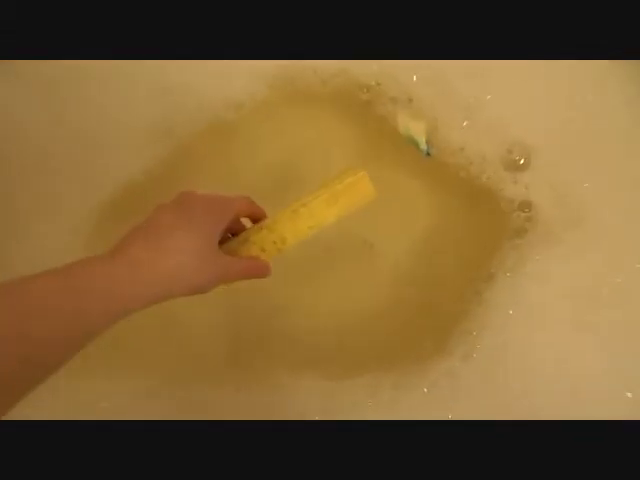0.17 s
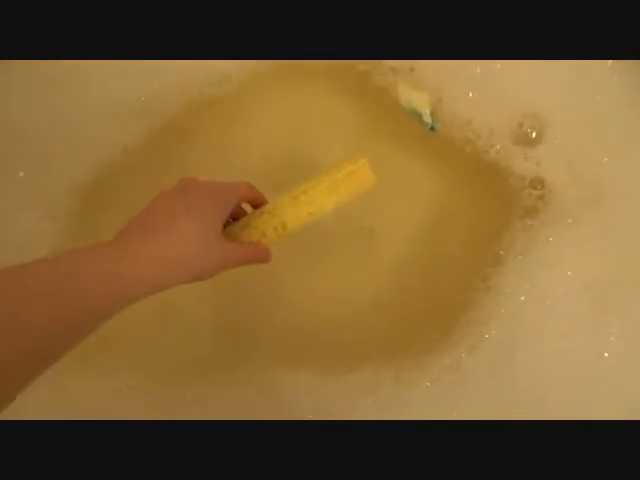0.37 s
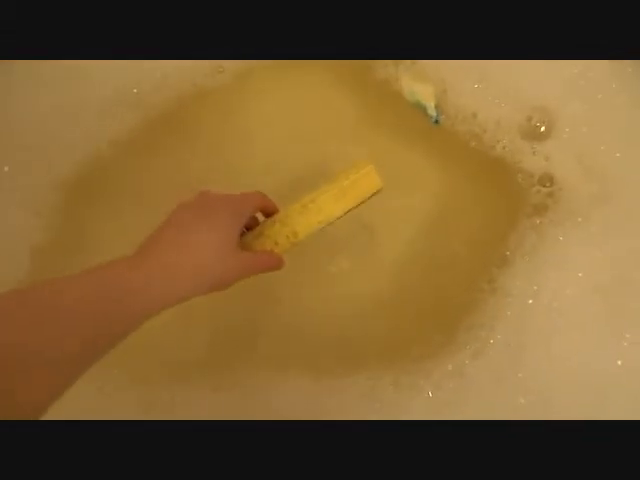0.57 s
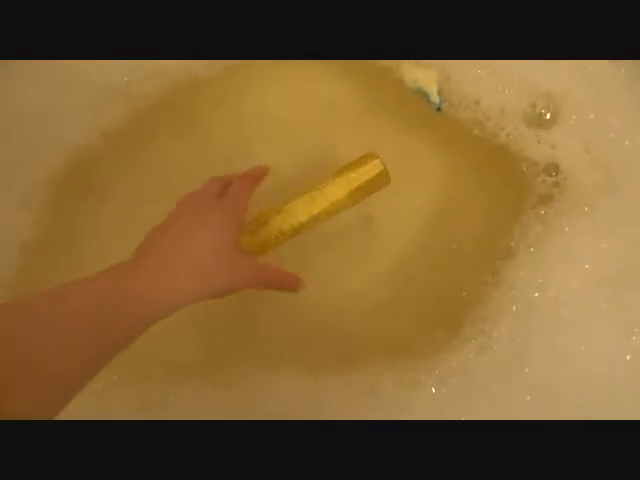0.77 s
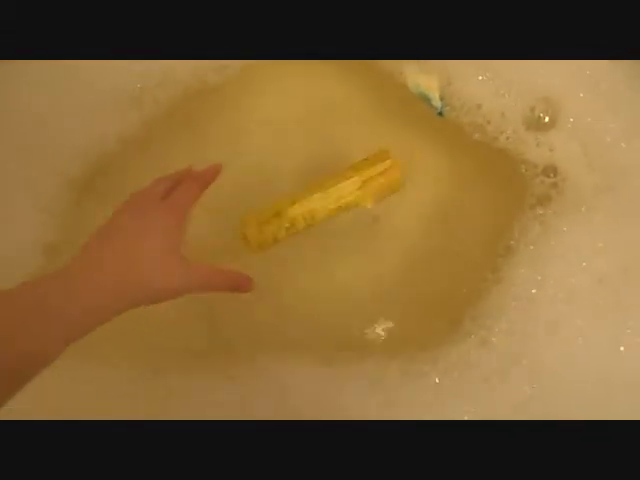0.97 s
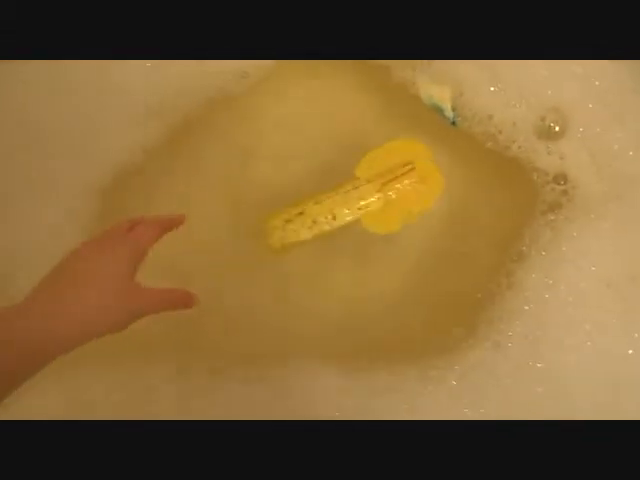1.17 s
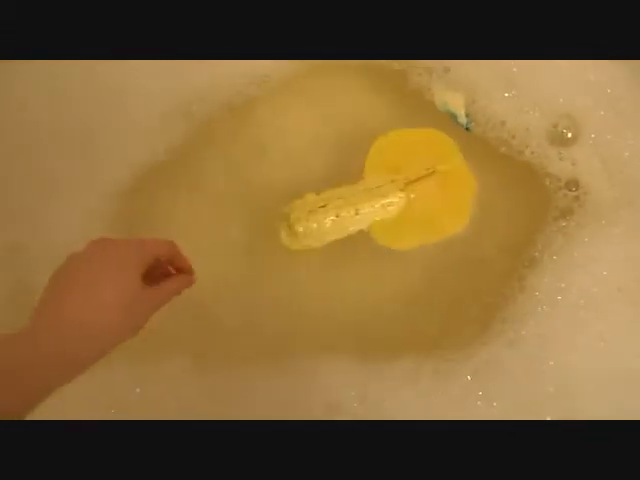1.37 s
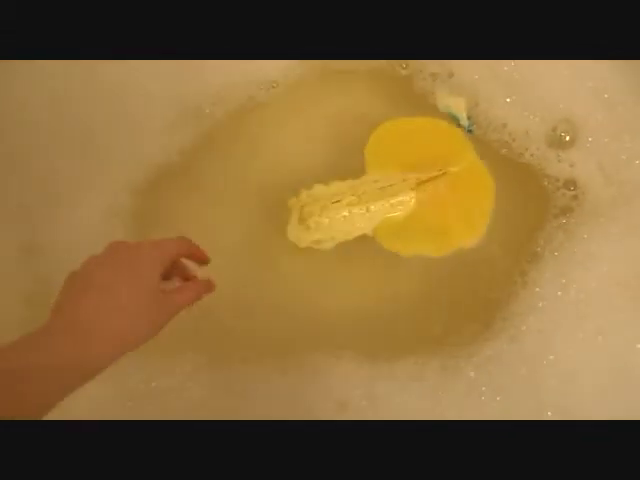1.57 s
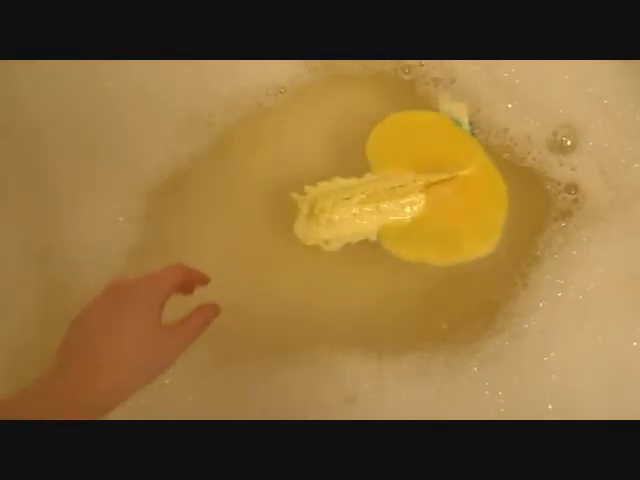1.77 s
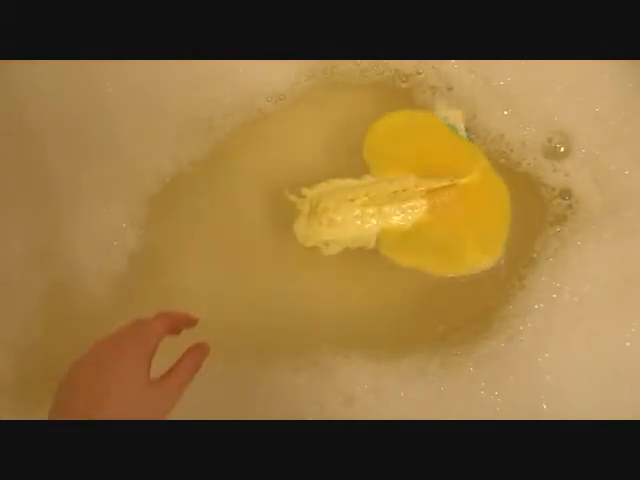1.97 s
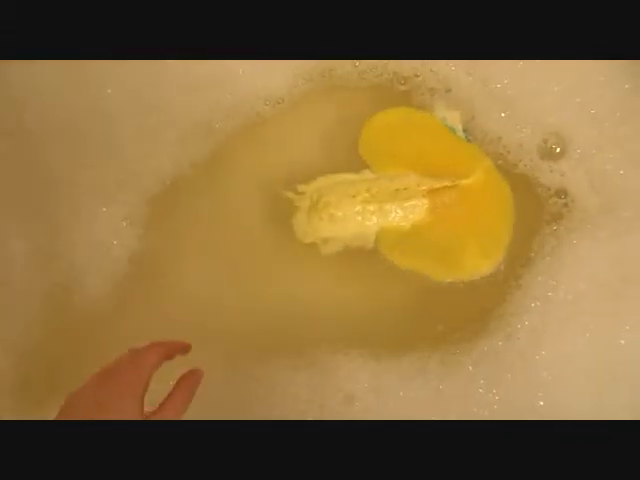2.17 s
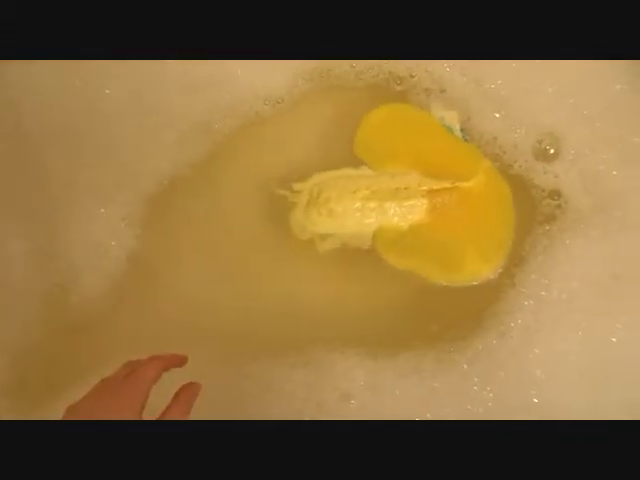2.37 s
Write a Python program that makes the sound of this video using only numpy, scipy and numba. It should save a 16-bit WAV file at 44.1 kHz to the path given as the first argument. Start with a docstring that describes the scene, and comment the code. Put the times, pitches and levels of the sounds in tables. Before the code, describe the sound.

A bath bomb fizzes in a tub, a few bubble pops swelling into a dense bright hiss

```python
"""A bath bomb is let go in a filled tub, heard about a metre above by a small stereo pair of microphones.
Shaped noise makes the microphone hiss and soft low rustle that lie under everything from the start.
A few bubbles pop as decaying sines, swarms of such sines splutter, and thousands of tiny bursts a second
grow into a dense fizz that holds; a few soft, low decaying tones at scattered times lie faint beneath it.
Random echoes of the tub walls ring briefly after the pops, splutters and low tones."""
import sys
import numpy as np
from scipy import signal
from scipy.fft import rfft, irfft
from scipy.io import wavfile
from scipy.ndimage import uniform_filter1d
from numba import njit

SR = 44100
rng = np.random.default_rng(int(sys.argv[2]) if len(sys.argv) > 2 else 0)


def level_to_linear(level):
    """Convert decibel levels to linear amplitude factors, elementwise."""
    exponent = np.asarray(level, float) / 20
    return 10 ** exponent


def put_to_file(sound):
    """Save the sound as 16-bit audio at rate SR, in the file named by the first command-line argument."""
    columns = np.atleast_2d(sound).T  # one column per channel
    safe = np.clip(columns, -1, 1)
    whole_steps = np.round(safe * 32767)
    wavfile.write(sys.argv[1], SR, whole_steps.astype(np.int16))


N = 105928
TIME_S = np.arange(N) / SR
FREQ_HZ = np.arange(N // 2 + 1) * SR / N


def level(x, db):
    """Root-mean-square normalisation: scale to the given rms level."""
    return x * level_to_linear(db) / np.sqrt(np.mean(x ** 2))


def curve(rows):
    """Linear interpolation in time of (time, value) rows."""
    rows = np.array(rows, float)
    return np.interp(TIME_S, rows[:, 0], rows[:, 1])


def colour_db(points, hz):
    """Spectral envelope: (frequency, level) points joined on a log-frequency axis."""
    points = np.array(points, float)
    return np.interp(np.log(hz + 1), np.log(points[:, 0]), points[:, 1])


def coloured(points):
    """Spectral shaping: two unrelated white noises weighted by one spectrum, at unit rms."""
    white = rng.standard_normal((2, N))
    shaped = irfft(rfft(white) * level_to_linear(colour_db(points, FREQ_HZ)), N)
    return level(shaped, 0)


def walk(rate_hz):
    """Slow random modulation: levels held for 1 / rate, smoothed twice, with unit spread."""
    hold = int(SR / rate_hz)
    steps = np.repeat(rng.standard_normal(N // hold + 1), hold)
    smooth = uniform_filter1d(uniform_filter1d(steps, hold), hold)[:N]
    return smooth / smooth.std()


@njit
def grains(start, hz, cycles, size, glide):
    """Damped resonance: each tone swells over half a cycle, then decays exponentially as its pitch rises."""
    out = np.zeros(N)
    for k in range(len(start)):
        n = int(2 * cycles[k] * SR / hz[k]) + 2
        fade = 1000. ** (-1. / n)  # 60 dB over the n samples
        a = size[k]
        phase = 0.
        for i in range(min(n, N - start[k])):
            # the pitch has risen by the share "glide" half-way through the ring
            phase += 2 * np.pi * hz[k] * (1 + glide * 2 * i / n) / SR
            out[start[k] + i] += a * np.sin(phase) * min(phase / np.pi, 1.)
            a *= fade
    return out


def fizz():
    """Superposed random bursts: fine fizz grows, led by a coarser gush that shares its small surges."""
    # activity of the fine fizz: (time [s], level [dB])
    fine_db = [(1.08, -63), (1.15, -56), (1.23, -49), (1.33, -45.5), (1.45, -43), (1.6, -41), (1.774, -40),
               (2.1, -40), (2.4, -40)]
    # strength of fine bubbles by pitch: (pitch [Hz], level [dB])
    fine_colour = [(1500, -50), (2300, -39), (3300, -44), (5000, -14), (7000, -11.5), (9000, -7),
                   (10500, -8.5), (11900, -4.5), (13200, -6.5), (14800, -11.5), (16500, -9)]
    # first gush of larger bubbles as trapped air escapes: (time [s], level [dB])
    gush_db = [(.95, -85), (1.0, -61), (1.12, -62), (1.2, -55.5), (1.4, -54), (1.5, -58), (1.8, -61),
               (2.4, -59)]
    # strength of gush bubbles by pitch: (pitch [Hz], level [dB])
    gush_colour = [(700, -5), (1200, -5), (2500, -2), (4500, -2.5), (7000, -5), (9000, -15)]
    fine_per_s, fine_cycles = 35000, 6.1
    gush_per_s, gush_cycles = 5000, 6.8
    onset_s, fade_in_s = fine_db[0][0], 0.28
    young_share, young_hz, ripe_s = 0.16, 12000, 1.8
    surge_db, flicker_db = .4, .3  # rms spread

    swell = np.clip((TIME_S - onset_s) / fade_in_s + 1, 0, 1)  # full at the onset
    fine = wide(fine_per_s, fine_colour, fine_cycles) * level_to_linear(curve(fine_db))
    # young fizz lacks a share of its finest bubbles until it is ripe
    missing = young_share * np.clip((ripe_s - TIME_S) / (ripe_s - onset_s), 0, 1)
    finest = irfft(rfft(fine) / (1 + (young_hz / (FREQ_HZ + 1)) ** 10), N)
    fine = fine - missing * finest
    coarse = wide(gush_per_s, gush_colour, gush_cycles) * level_to_linear(curve(gush_db))
    surges_db = surge_db * walk(6.04) + flicker_db * walk(29.86)
    balance_db = np.array([[-.1], [.1]])  # left, right
    return (swell * fine + coarse) * level_to_linear(surges_db + balance_db)


def wide(*swarm):
    """Partial coherence of a wide source: one swarm reaches both sides, another each side alone."""
    shared_share, lag_s = 0.38, .00001  # share of power; left hears the shared swarm later by the lag
    turn = np.exp(-1j * np.pi * lag_s * FREQ_HZ * np.array([[1], [-1]]))
    shared = irfft(rfft(froth(*swarm)) * turn, N)
    separate = np.array([froth(*swarm), froth(*swarm)])
    return np.sqrt(shared_share) * shared + np.sqrt(1 - shared_share) * separate


def froth(per_s, colour, cycles):
    """Random-arrival process: bubbles of scattered pitch and size burst at independent times, at unit rms."""
    size_spread_db = 0.9  # mean of an exponential scatter
    when, pitch, luck = rng.random((int(per_s * N / SR), 3)).T
    start = (when * N).astype(np.int64)
    hz = colour[0][0] + (colour[-1][0] - colour[0][0]) * pitch
    size_db = colour_db(colour, hz) - size_spread_db * np.log(1 - luck)
    size = level_to_linear(size_db) * np.sqrt(hz)  # offsets the shorter ring of higher pitches
    return level(grains(start, hz, np.full(len(hz), float(cycles)), size, 0.07), 0)


def bubbles():
    """Film rupture and cavity resonance: each pop is a short snap with the bubble's ring."""
    # single bubbles before panning:
    # (time [s], level [dB], pitch [Hz], length [cycles], pitch rise half-way [share])
    pops = [(0.7578, -37.5, 2830, 16.5, 0.023), (0.7604, -38, 3020, 7.2, .02), (.7768, -48, 2900, 9, .03),
            (0.8194, -47, 9000, 40, .3), (0.8285, -36, 3250, 3.6, .05), (.8322, -44, 3300, 6.5, .05),
            (.8475, -43, 2900, 7, .05), (1.0115, -37, 5000, 4.5, .05), (1.095, -51, 5260, 6.6, .05),
            (1.2912, -34.5, 3800, 5.5, .05), (1.3004, -43, 3500, 7, .05)]
    snap_db, snap_cycles = 3, 1.5  # snap level over the ring
    pan_db = -7  # left minus right
    out = np.zeros(N)
    for s, db, hz, cycles, glide in pops:
        at = np.full(2, int(s * SR))
        pitches = np.minimum([hz, 2 * hz], 15000.)  # ring, snap
        sizes = level_to_linear([db, db + snap_db])
        out += grains(at, pitches, np.array([cycles, snap_cycles]), sizes, float(glide))
    return out * level_to_linear(np.array([[pan_db], [-pan_db]]) / 2)


def splutters():
    """Clustered bubble resonances: short swarms around one pitch as water soaks the bomb."""
    # swarms: (start [s], length [s], level of a typical bubble [dB], centre pitch [Hz])
    swarms = [(0.964, 0.0065, -55, 6550), (0.964, 0.043, -62, 10000), (.973, 0.0054, -54, 7300),
              (0.9739, 0.0044, -49, 5100), (0.979, 0.0028, -52, 5100), (.988, .013, -47.5, 5400),
              (1.009, 0.0061, -54, 5300), (1.019, .008, -57, 4920), (1.041, 0.0084, -53, 5300),
              (1.067, .008, -58, 4800), (1.094, 0.0055, -54, 5600), (1.182, 0.028, -58, 2320)]
    per_s, cycles = 3000, 6.5
    spread_octaves, spread_db = .22, 3
    out = np.zeros(N)
    for s, length, db, hz in swarms:
        n = int(per_s * length) + 2
        start = ((s + length * rng.random(n)) * SR).astype(np.int64)
        pitches = hz * 2 ** (spread_octaves * rng.standard_normal(n)).clip(-1, 1)
        sizes = level_to_linear(db + spread_db * rng.standard_normal(n).clip(-2, 2))
        out += grains(start, pitches, np.full(n, cycles), sizes, 0.23)
    return out


def low_tones():
    """Exponential decay: a few soft, low decaying tones at scattered times, faint beneath the fizz."""
    # low tones: (time [s], level [dB], pitch [Hz], length [cycles])
    tones = [(1.197, -47, 725, 14), (1.2, -47.5, 420, 8.5), (1.276, -51, 495, 11), (1.312, -64, 503, 11),
             (1.327, -49.5, 384, 7), (1.393, -51, 1050, 17), (1.434, -50.5, 470, 9),
             (1.619, -53.5, 270, 15), (1.622, -51, 568, 14)]
    s, db, hz, cycles = np.array(tones, float).T
    return grains((s * SR).astype(np.int64), hz.copy(), cycles.copy(), level_to_linear(db), 0.03)


def tub(x):
    """Reverberation: dense decaying echoes of the tub walls, different at each microphone."""
    t60_s, echo_db, delay_s = .12, -6, .0015  # echo energy is relative to the direct sound
    t = np.arange(int(.4 * SR)) / SR
    tail = rng.standard_normal((2, len(t))) * level_to_linear(-60 * t / t60_s) * (t > delay_s)
    tail *= level_to_linear(echo_db) / np.sqrt(np.sum(tail ** 2, axis=1, keepdims=True))
    return x + signal.fftconvolve(x, tail, axes=1)[:, :N]


def rustle():
    """Amplitude-modulated noise: a soft low rustle swells and dips, slightly coherent between sides."""
    # swells and dips: (time [s], relative level [dB])
    swells_db = [(0.0, -55), (0.07, -57), (0.09, -50), (0.47, -60), (1.02, -56.5), (1.05, -52.5),
                 (1.16, -59), (1.3, -54.5), (1.45, -60), (1.55, -61), (1.7, -58.5), (1.85, -56), (2.1, -58),
                 (2.4, -58.5)]
    # spectrum: (frequency [Hz], relative level [dB])
    rustle_colour = [(100, -30), (200, -11), (300, 2), (500, 4), (900, -13.5), (1600, -7), (3000, -24.5)]
    likeness = 0.073  # correlation of left and right
    noise = coloured(rustle_colour)
    mid = noise[0] * np.sqrt(1 + likeness)
    side = noise[1] * np.sqrt(1 - likeness)
    return np.array([mid + side, mid - side]) * level_to_linear(curve(swells_db)) / 2


def hiss():
    """Stationary noise: the microphones' own hiss, independent on each side."""
    # spectrum: (frequency [Hz], relative level [dB])
    hiss_colour = [(24, -71), (40, -43.5), (267, -5.5), (538, -9), (641, -6.5), (932, -7.5), (1060, -7.5),
                   (1320, -8.5), (1430, -11), (15700, -19.5)]
    return coloured(hiss_colour) * level_to_linear(-53 + np.array([[-.4], [.4]]))  # rms dB, left and right


def scene():
    """Linear superposition: pops, splutters and low tones echoed by the tub, with the fizz and rustle."""
    return tub(bubbles() + splutters() + low_tones()) + fizz() + rustle()


def band_limit(x):
    """A steep low-pass at the top of the band."""
    return signal.sosfilt(signal.butter(12, 17000, fs=SR, output="sos"), x)


def record(dry):
    """Linear filtering: the microphones cut the bass, ring a little in the treble, add hiss and end at the top."""
    low_cut_hz, top_hz = 129, 15760
    capsule_hz, capsule_q, capsule_db = 11800, 5.3, -11.5  # resonance added to the flat response
    x = signal.sosfilt(signal.butter(3, low_cut_hz, "high", fs=SR, output="sos"), dry)
    ring = signal.lfilter(*signal.iirpeak(capsule_hz, capsule_q, fs=SR), x)
    mix = x + level_to_linear(capsule_db) * ring + hiss()
    mix = irfft(rfft(mix) * (FREQ_HZ < top_hz), N)
    return band_limit(mix)


dry = scene()
out = record(dry)
put_to_file(out)
```